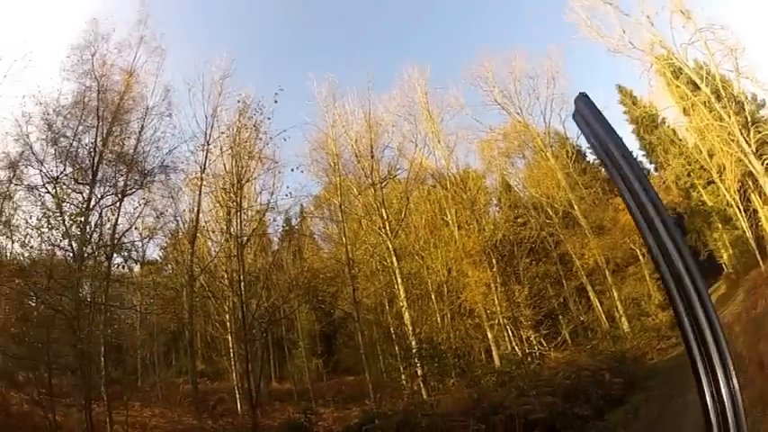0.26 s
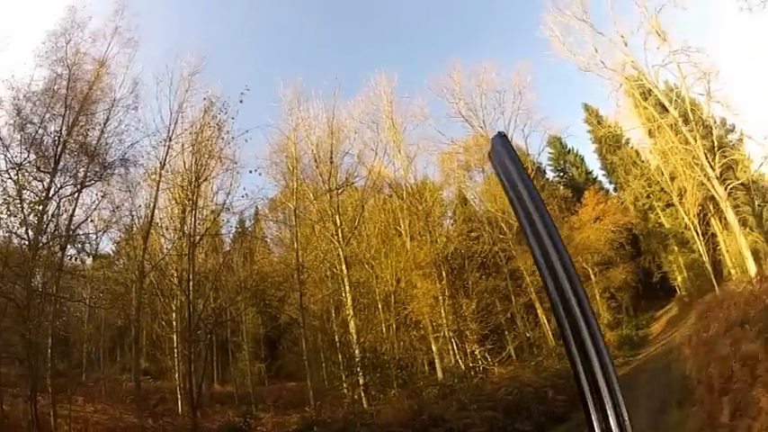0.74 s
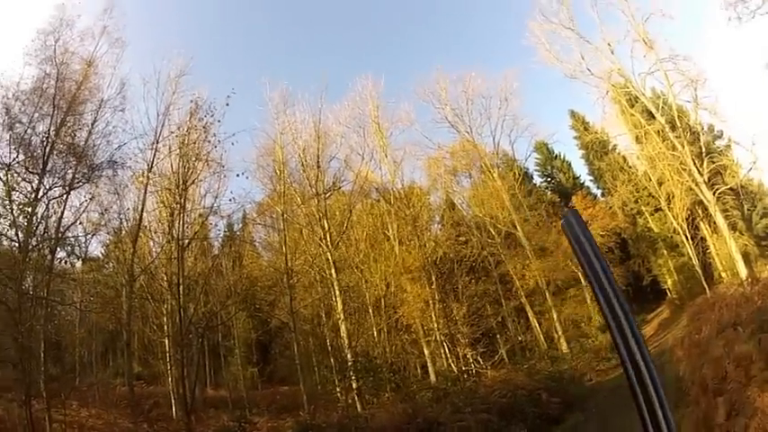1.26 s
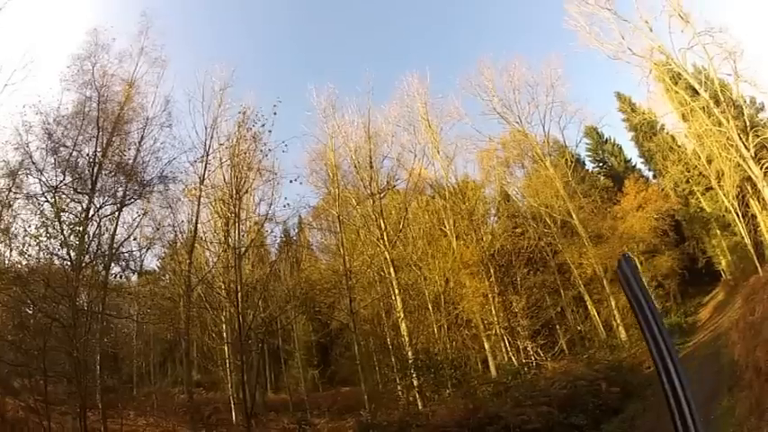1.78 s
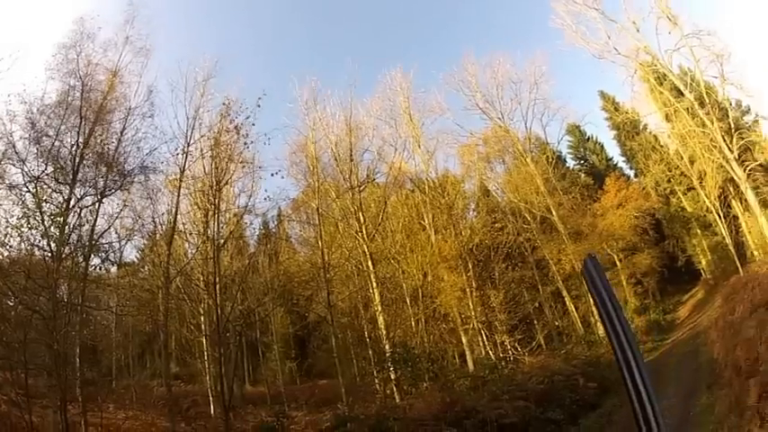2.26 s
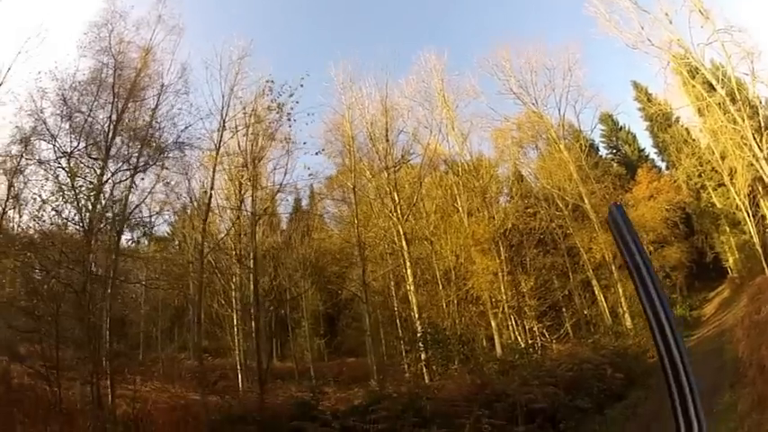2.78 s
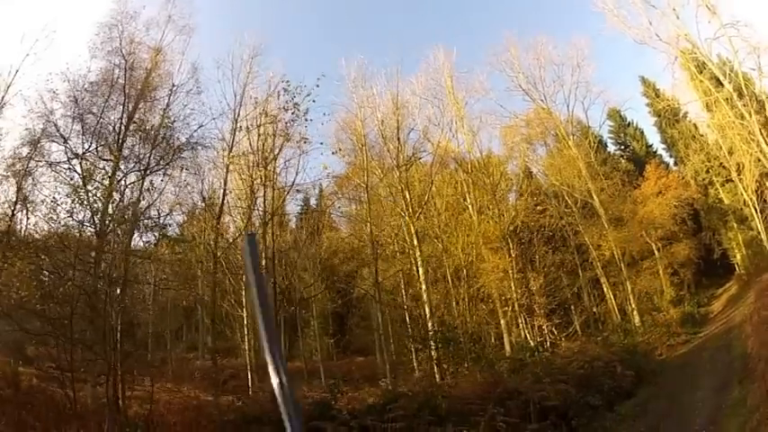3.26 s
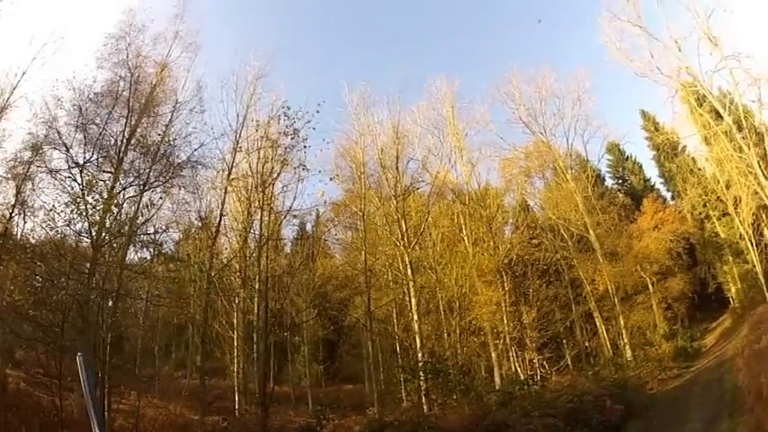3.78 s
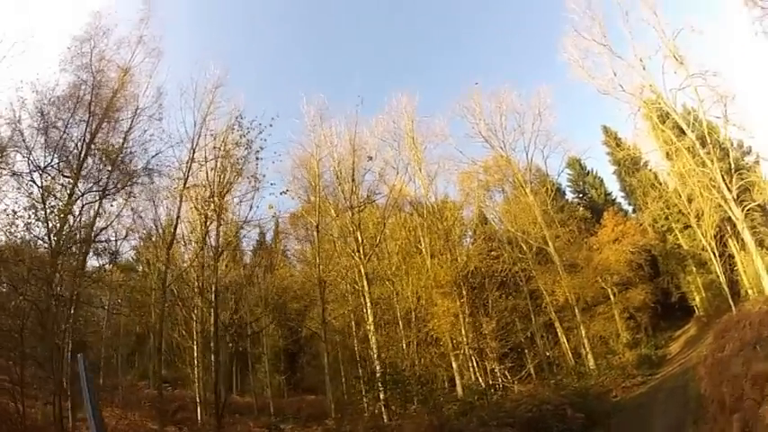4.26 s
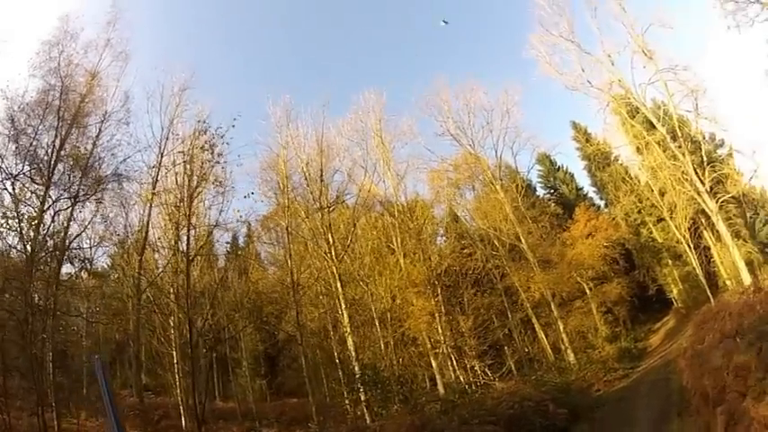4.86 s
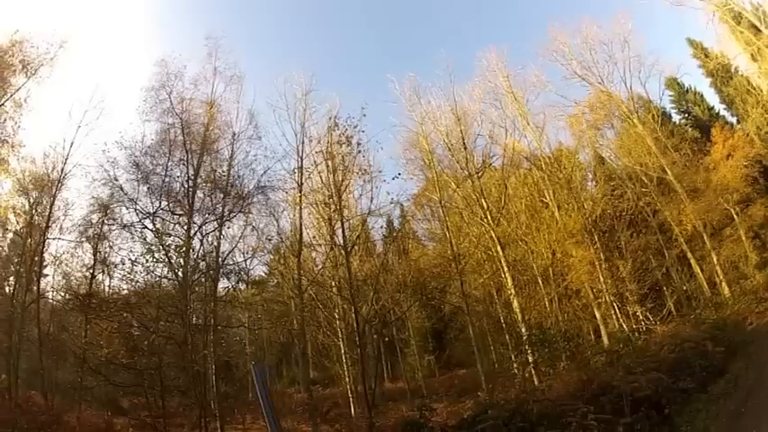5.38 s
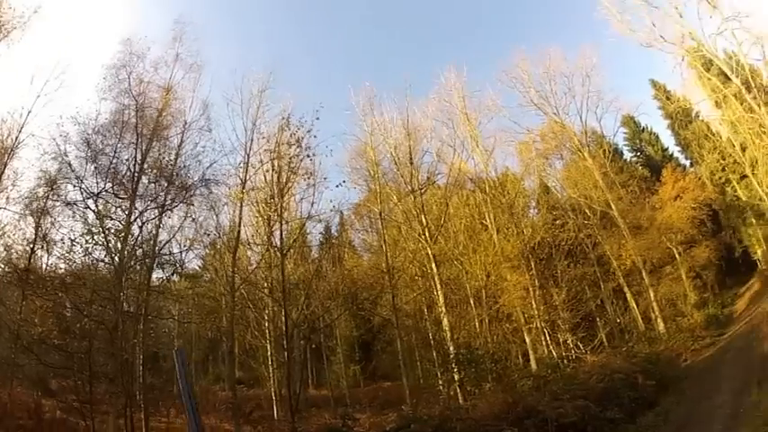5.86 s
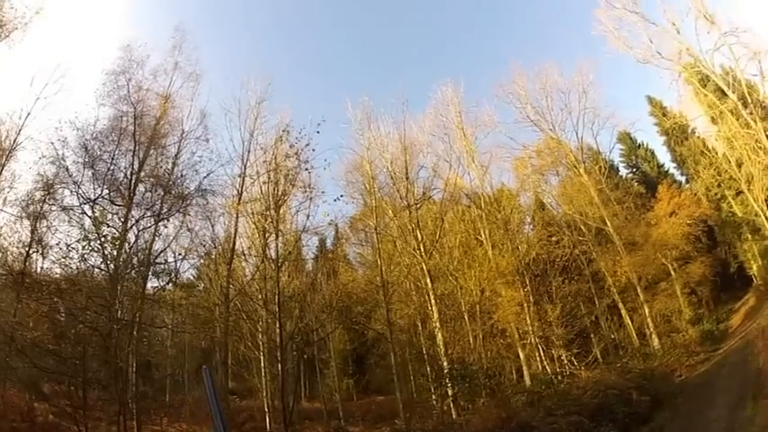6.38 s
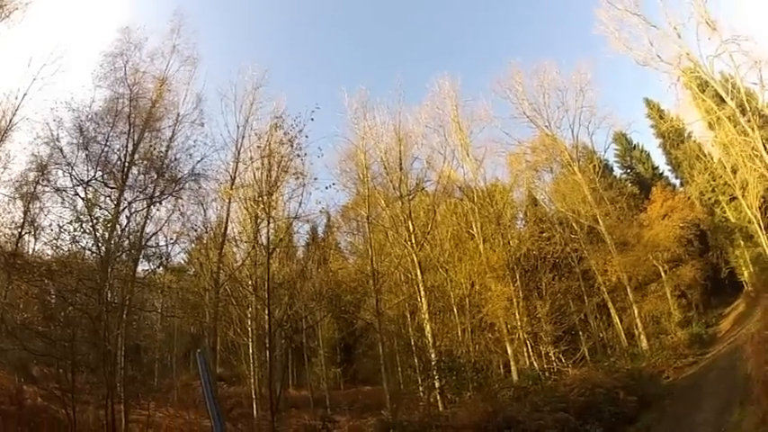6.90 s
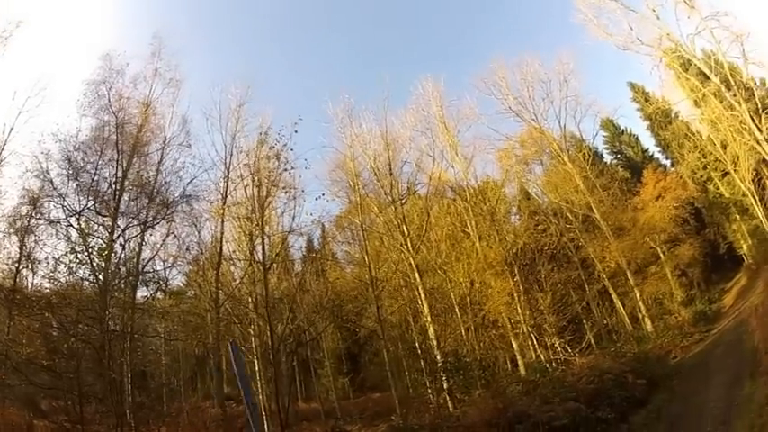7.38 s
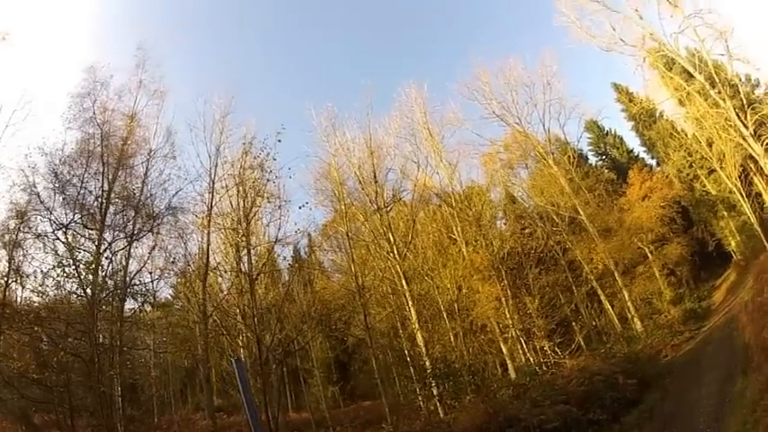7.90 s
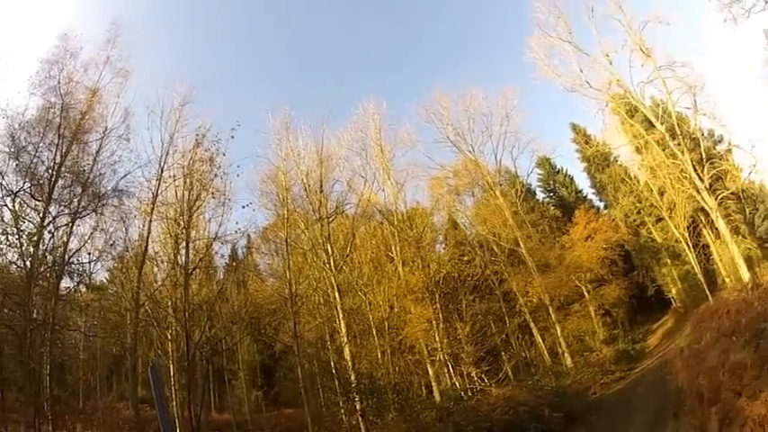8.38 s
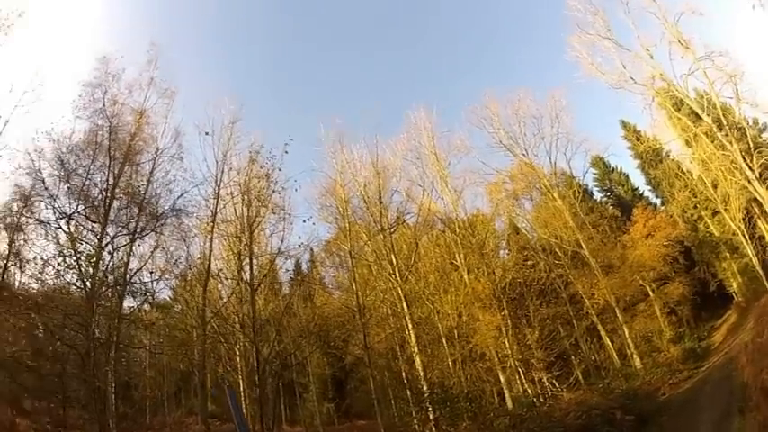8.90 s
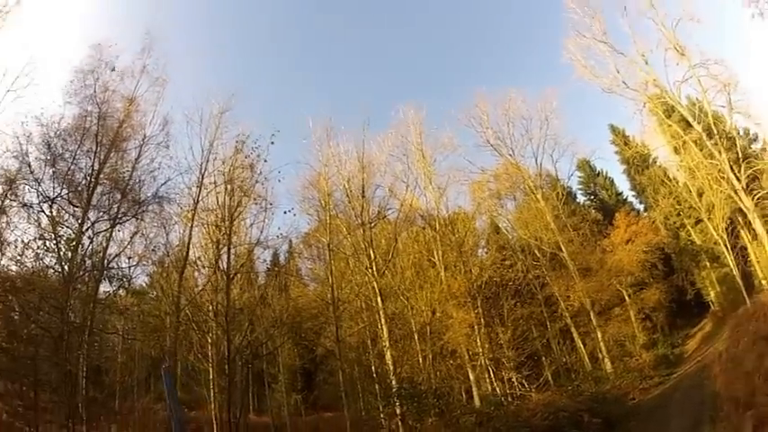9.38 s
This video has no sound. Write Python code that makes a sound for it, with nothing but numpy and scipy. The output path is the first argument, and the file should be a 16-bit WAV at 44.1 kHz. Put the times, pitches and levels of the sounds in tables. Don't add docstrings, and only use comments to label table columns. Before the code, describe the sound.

Quiet wood, light gun rattles and a distant cackling pheasant, then two distorted shotgun shots rolling off the trees, faint ticking, a metallic break-open clack and wind bumps.

```python
import sys
import numpy as np
from scipy import signal
from scipy.fft import rfft, irfft, next_fast_len
from scipy.io import wavfile
from scipy.ndimage import uniform_filter1d

SR = 44100
rng = np.random.default_rng(int(sys.argv[2]) if len(sys.argv) > 2 else 0)


def digitize_waveform(pressure):
    field = np.atleast_2d(pressure).T
    bounded = np.clip(field, -1, 1)
    quanta = np.round(bounded * 32767).astype(np.int16)
    wavfile.write(sys.argv[1], SR, quanta)


def ratio(d):
    e = np.asarray(d, float) / 20
    return 10 ** e


N = 425124
TIME = np.arange(N) / SR


def rms_one(x):
    return x / np.sqrt(np.mean(x ** 2) + 1e-20)


def coloured(x, spectrum):
    hz, db = np.transpose(spectrum)
    size = next_fast_len(N)
    grid_hz = np.maximum(np.arange(size // 2 + 1) * SR / size, 1)
    gain_db = np.interp(np.log(grid_hz), np.log(hz), db, left=-90, right=-90)
    return rms_one(irfft(rfft(x, size) * ratio(gain_db), size)[:N])


def drift(rate_hz):
    knots = rng.standard_normal(int(N / SR * 60) + 2)
    return np.interp(TIME * rate_hz, np.arange(len(knots)), knots)


def bumps(t, rows):
    return sum(db * np.exp(-.5 * ((t - s) / width_s) ** 2) for s, width_s, db in rows)


def resonate(x, hz, width_hz):
    r = np.exp(-np.pi * width_hz / SR)
    b = [(1 - r * r) / 2, 0, (r * r - 1) / 2]
    return signal.lfilter(b, [1, -2 * r * np.cos(2 * np.pi * hz / SR), r * r], x)


def decaying(t, hz, t60_s):
    return np.sin(2 * np.pi * hz * t) * ratio(-60 * t / t60_s)


def add(out, s, sound):
    i = round(s * SR)
    out[i:i + len(sound)] += sound[:N - i]


# shot_s, case_ring_hz, upper_ring_db, gain_clamp_ms
SHOTS = [
    (2.48268, 484, -15, 4.6),
    (3.16530, 474, -13, 4.0),
]
BLOW_DB, HEAD_START_TURNS = 3.6, .16


def blasts():
    out, t = np.zeros(N), TIME[:SR // 10]
    for (shot_s, ring_hz, upper_db, clamp_ms), thump_db in zip(SHOTS, (-13, -10)):
        ring = -np.sin(2 * np.pi * (ring_hz * t + HEAD_START_TURNS)) * ratio(-60 * t / .09)
        ring *= ratio(-60 * np.maximum(t - clamp_ms / 1000, 0) / 0.017)
        upper = 2.2 * decaying(t, 790, 0.04) + 1.9 * decaying(t, 1300, 0.025) + decaying(t, 2120, 0.038)
        upper = ratio(upper_db) * upper
        spray = ratio(-12.5) * resonate(rng.standard_normal(len(t)), 2300, 2400) * ratio(-60 * t / 0.088)
        clamp_db = -17 / (1 + np.exp(np.clip((clamp_ms - 1000 * t) / 0.3, -50, 50)))
        after = ratio(-6.5) * (upper + spray) * (1000 * t > clamp_ms)
        add(out, shot_s, ratio(BLOW_DB + clamp_db) * (ring + upper + spray) + after)
        add(out, shot_s + .002, ratio(thump_db) * decaying(t, 98, .065))
    return out


def roll_db(t, layer, crest_s, loss_db_per_s):
    crest_db, rise_db, near_db_per_s, far_db, far_db_per_s = layer
    late_s = np.maximum(t - crest_s, 0)
    near_power = ratio(-(near_db_per_s + loss_db_per_s) * late_s) ** 2
    far_power = ratio(far_db - far_db_per_s * late_s) ** 2
    rising_db = rise_db * np.clip(1 - t / crest_s, 0, 1)
    return crest_db - rising_db + 10 * np.log10(near_power + far_power)


# hz, level_db_per_hz
BOOM = [(120, -45.5), (200, -17.5), (260, -8.5), (391, -2), (489, 0.5), (581, 1), (646, -3.5), (760, -23.5),
        (990, -45.5), (1670, -120)]
SIZZLE = [(1940, -34), (3300, -6.5), (3560, -3.5), (3860, -2.5), (4200, -4.5), (4630, -5), (5440, -9.5),
          (5950, -10), (7740, -53), (13100, -120)]
RUMBLE = [(21, -48), (35, -8), (91, 3), (126, -3), (162, -3.5), (200, -11.5), (260, -40.5), (440, -120)]
# mode_hz, width_hz, level_db
CRACK = [
    [(835, 150, -5.5), (1151, 110, -1.5), (1590, 110, 0.5), (2240, 220, -2), (2650, 240, -2.5),
     (3050, 770, -5.5)],
    [(820, 87, -5.5), (1027, 140, -1.5), (1525, 100, -3), (2040, 230, -2), (2566, 150, -2.5), (2975, 84, 1),
     (3150, 130, -8)],
]
# crest_s, level_db, treble_loss_db_per_s
SWELLS = [
    (.2, -1.7, 7.5),
    (0.12, -1.3, 5.5),
]
# crest_db, rise_db, near_fall_db_per_s, far_wood_db (re crest), far_fall_db_per_s
LAYERS = [
    (-21, 5.5, 21.5, -12.5, 7),
    (-24.5, 7, 31, -15, 12),
    (-35.5, 3, 42, -34.5, 4),
    (-35.5, 14, 32.5, -16, 6.5),
]
# after_shot_s, half_width_s, lift_db
STANDS = [
    (0.048, 0.01, 3),
    (.18, 0.041, 4.5),
    (.24, 0.011, 1.5),
    (0.401, 0.013, 4),
    (.55, .035, 2),
    (1.98, 0.13, 3),
]
STAND_SHARES = (1.0, 0.13, 0.27, 0.43)
DULLING_DB_PER_S = 4.5


def echo():
    sizes = ratio(1.8 * np.minimum(rng.exponential(1, N), 5)) * rng.choice([-1, 1], N)
    returns = sizes * (rng.random(N) < 4000 / SR) * ratio(0.69 * drift(35) + 1.1 * drift(16))
    boom, sizzle, rumble = coloured(returns, BOOM), coloured(returns, SIZZLE), coloured(returns, RUMBLE)
    out, ends_s = np.zeros(N), [SHOTS[1][0], N / SR]
    for (crest_s, level_db, loss), modes, (shot_s, *_), end_s in zip(SWELLS, CRACK, SHOTS, ends_s):
        t = TIME - shot_s
        lift_db = bumps(t, STANDS)
        crack = np.zeros(N)
        for k, (hz, width_hz, db) in enumerate(modes):
            dulling_db = DULLING_DB_PER_S * np.log2(hz / 1600) * np.clip(t, 0, 2.5)
            crack += ratio(db - dulling_db) * resonate(returns, hz, width_hz) * (-1) ** k
        sounds = (boom, rms_one(crack), sizzle, rumble)
        rolling = np.zeros(N)
        for sound, layer, share, is_high in zip(sounds, LAYERS, STAND_SHARES, (0, 1, 1, 0)):
            layer_db = level_db + roll_db(t, layer, crest_s, loss * is_high) + share * lift_db
            rolling += ratio(layer_db) * sound
        arrived = np.clip((t - .004) / .012, 0, 1) * (TIME < end_s)
        out += arrived * rolling
    return out


# start_s, peak_db, ring_db, rattle_centre_hz
CLACKS = [(0.2399, -59, -36, 3150), (0.5945, -56, -40, 2600), (0.6659, -53, -40, 2040),
          (0.7468, -49, -40, 3100), (0.7524, -45, -40, 2130), (0.7731, -48, -40, 2800),
          (0.9667, -49, -40, 2520), (1.26, -51.5, -40, 3760), (1.5274, -48, -40, 3640),
          (5.9599, -48, -31, 3810), (1.3648, -47, -40, 5100), (4.7794, -52, -35, 5100),
          (4.813, -51, -36, 5100), (5.2664, -45, -40, 5100), (5.4824, -52, -40, 5100),
          (5.974, -27.5, -24, 4060), (5.9864, -29, -14, 4300), (6.2063, -28, -12, 3640),
          (6.2112, -38, 0, 2050), (6.2154, -39, -9, 4200), (6.237, -49, -30, 2210), (6.063, -56, -30, 4800)]
# mode_hz, level_db, t60_s
ACTION = [(1350, -23, 0.087), (2140, -2, 0.099), (2540, 8, 0.015), (3480, -1, 0.022), (4300, 2, 0.0065),
          (4750, -2, 0.049)]
STEEL_HZ, STEEL_T60_S = 4330, .2


def gun():
    out, t = np.zeros(N), TIME[:SR // 4]
    rattles = rng.standard_normal((len(CLACKS), len(t))) * ratio(-60 * t / 0.022)
    lucks = rng.standard_normal((len(CLACKS), len(ACTION)))
    for (start_s, peak_db, ring_db, colour_hz), luck, rattle in zip(CLACKS, lucks, rattles):
        hit = 10.7 * resonate(resonate(rattle, colour_hz, 2300), colour_hz, 2300)
        for (hz, mode_db, t60_s), z in zip(ACTION, luck):
            struck_db = mode_db + 1.1 * z - 3.9 * abs(np.log2(hz / colour_hz))
            hit = hit + ratio(struck_db) * decaying(t, hz * (1 + 0.044 * z), t60_s)
        steel = ratio(ring_db) * decaying(t, STEEL_HZ, STEEL_T60_S)
        add(out, start_s, ratio(peak_db - 15.5) * (hit + steel))
    return out


# start_s, peak_db
CACKLE = [
    (1.272, -59.5),
    (1.402, -52.5),
    (1.54, -52),
    (1.713, -55),
    (1.877, -54),
    (2.04, -53.5),
    (2.201, -53.5),
    (2.417, -52),
]
# formant_hz, width_hz, level_db
THROAT = [(834, 84, 5), (1050, 220, -4.5), (2100, 580, -8.5), (3000, 300, -8), (3800, 150, -5.5),
          (4100, 200, -8), (4630, 1500, -17.5)]
CACKLE_HZ, CACKLE_S = 1033, 0.084


def pheasant():
    source, t = np.zeros(N), TIME[:SR // 4]
    noises = rng.standard_normal((len(CACKLE), 3, len(t)))
    arc = np.sin(np.pi * np.clip(t / CACKLE_S, 0, 1)) ** 0.63
    tail = .5 * (t > CACKLE_S / 2) * ratio(-60 * t / .6)
    for (start_s, peak_db), (waver_noise, breath, flutter_noise) in zip(CACKLE, noises):
        waver = rms_one(uniform_filter1d(waver_noise, size=200))
        flutter = rms_one(uniform_filter1d(flutter_noise, size=350))
        phase = np.cumsum(CACKLE_HZ * (.98 + .04 * arc + .05 * waver)) / SR
        pulses = (np.diff(np.floor(phase), prepend=0) > 0) * 11 * ratio(4 * flutter)
        smear = 2.2 * breath * (arc + tail)
        add(source, start_s, ratio(peak_db + 1) * (pulses * arc + smear))
    return sum(ratio(db) * resonate(source, hz, width_hz) * (-1) ** k
               for k, (hz, width_hz, db) in enumerate(THROAT))


# start_s, peak_db, loudest_ring_hz, length_s
CLUCKS = [(4.089, -46.5, 3050, 0.021), (4.144, -51, 3100, 0.023), (4.321, -51, 3780, 0.022),
          (4.424, -51, 3300, 0.02), (4.55, -57, 3800, 0.024), (4.658, -50, 3260, 0.017),
          (4.83, -51.5, 3260, 0.029), (4.989, -52.5, 4000, 0.02), (5.098, -51, 2930, 0.031),
          (5.187, -52.5, 3000, 0.025), (5.386, -52, 3100, 0.021), (5.506, -52.5, 3040, 0.039),
          (5.74, -52.5, 3800, 0.026), (5.862, -54, 4000, 0.017), (6.0666, -51, 3000, 0.0089),
          (6.2706, -48, 3830, 0.02), (6.413, -49.5, 3850, 0.037), (7.705, -60.5, 2940, 0.013),
          (7.817, -56, 3200, 0.011), (8.428, -61, 3090, 0.016), (8.803, -61, 3000, 0.014),
          (8.897, -56, 3250, 0.0065)]
# mode_hz, width_hz, level_db
CLUCK_MODES = [(855, 146, 7), (1076, 85, -1), (2190, 340, 1.5), (3050, 270, -3.5), (3880, 140, 0.5),
               (4630, 460, -5.5), (5100, 540, -12.5)]


def clucks():
    out, t = np.zeros(N), TIME[:SR // 3]
    noises = rng.standard_normal((len(CLUCKS), len(t)))
    lucks = rng.standard_normal((len(CLUCKS), len(CLUCK_MODES)))
    for (start_s, peak_db, ring_hz, length_s), noise, luck in zip(CLUCKS, noises, lucks):
        burst = noise * ((t < length_s) * np.minimum(t / 0.0047, 1) + ratio(-3.5 - 60 * t / 1.05))
        body = np.zeros(len(t))
        for (hz, width_hz, mode_db), z in zip(CLUCK_MODES, luck):
            body += ratio(mode_db + 2 * z) * resonate(resonate(burst, hz, 3 * width_hz), hz, width_hz)
        ring = 0.95 * resonate(resonate(burst, ring_hz, 440), ring_hz, 120)
        add(out, start_s, ratio(peak_db + 3.0) * (body + ring))
    return out


# start_s, length_s, start_hz, end_hz, level_db
NOTES = [(1.28, 0.12, 950, 970, -59), (1.287, 0.058, 2970, 2770, -63), (1.35, 0.29, 3200, 3290, -70),
         (1.45, 0.078, 4100, 4060, -67), (2.085, 0.046, 748, 860, -56), (2.174, 0.064, 700, 800, -49.5),
         (2.34, 0.085, 3150, 3240, -65.5), (4.11, 0.42, 5480, 5780, -70), (5.2, .07, 5400, 5500, -71),
         (5.334, .12, 5630, 5500, -69), (7.755, 0.027, 2250, 2410, -63), (8.13, 0.11, 1527, 1530, -74.5),
         (8.3, .5, 1200, 1178, -73), (8.56, 0.11, 2420, 2300, -76), (8.56, 0.071, 4930, 4780, -69.5),
         (8.64, 0.14, 2180, 2220, -74), (8.66, 0.19, 759, 668, -61), (9.014, 0.058, 2970, 3400, -60.5),
         (9.16, 0.081, 704, 698, -58), (9.39, 0.05, 3150, 3050, -63.5), (9.52, .16, 2020, 2040, -70)]


def birds():
    out, tremble, waver_hz = np.zeros(N), ratio(3.5 * drift(60)), 20 * drift(60)
    for start_s, length_s, start_hz, end_hz, level_db in NOTES:
        first = int(start_s * SR)
        along = np.arange(min(int(length_s * SR), N - first - 1)) / (length_s * SR)
        pitch_hz = start_hz + (end_hz - start_hz) * along + waver_hz[first:][:len(along)]
        tone = np.sin(2 * np.pi * np.cumsum(pitch_hz) / SR)
        add(out, start_s, ratio(level_db) * np.sin(np.pi * along) ** .5 * tone)
    return out * tremble


# hz, level_db_per_hz
WOOD = [(15, -30), (25, -9.5), (52, -2.5), (108, -11.5), (270, -9), (356, -11), (390, -11.5), (617, -14),
        (1140, -31.5), (1280, -30.5), (1770, -32), (2990, -32), (5070, -37.5), (5950, -39), (7740, -76),
        (13100, -120)]
# time_s, level_db
BREEZE = [
    (0, -70.5),
    (1.2, -70),
    (2.4, -67.5),
    (4.6, -70),
    (5.8, -69),
    (7.0, -70),
    (9.64, -70),
]
# centre_s, lift_db, half_width_s
GUSTS = [(.14, 2, 0.088), (.45, 1, .1), (.84, 10, .06), (1.25, 1.5, 0.083), (2.3, 2, 0.17), (4.57, 9, .04),
         (5.3, 5.5, 0.22), (6.502, -8, 0.73), (7.5, 11.5, 0.25), (8.95, 16, 0.086), (9.15, 14, 0.096),
         (9.552, 8.5, .1)]
# start_s, centre_hz, width_hz, level_db
RUSTLE = (9.55, 2850, 500, -61)
WIND_DB, WIND_FOLLOWS = -56.5, .8


def air():
    leaves_db = np.interp(TIME, *np.transpose(BREEZE))
    gusts_db = bumps(TIME, [(s, width_s, db) for s, db, width_s in GUSTS])
    wind_db = WIND_DB + WIND_FOLLOWS * (leaves_db - leaves_db.mean()) + gusts_db
    duck_db = sum(-np.clip(25 - 30 * (TIME - s), 0, 40) * (TIME > s) for s, *_ in SHOTS)
    leaves = coloured(rng.standard_normal(N), WOOD) * ratio(leaves_db + 15.5 + 1.0 * drift(7.5))
    wind = coloured(rng.standard_normal(N), [(18, -12.5), (35, -8), (70, -4.5), (120, -14), (260, -33.5)])
    wind = wind * ratio(wind_db - 5.5 + 2.0 * drift(1.9))
    start_s, hz, width_hz, db = RUSTLE
    rustle = rms_one(resonate(rng.standard_normal(N), hz, width_hz))
    rustle = rustle * np.clip((TIME - start_s) / .04, 0, 1) * ratio(db)
    return ratio(duck_db) * (leaves + wind) + rustle


TREES_T60_S = 0.85


def among_trees(x, wet_db):
    t = TIME[:SR // 2]
    haze = rng.standard_normal(len(t)) * ratio(-60 * t / TREES_T60_S) * np.minimum(t / 0.024, 1)
    return x + ratio(wet_db) * signal.fftconvolve(x, haze / np.sqrt(np.sum(haze ** 2)))[:N]


# hz, level_db_per_hz
SELF_NOISE = [(18, -44.5), (30, -7.5), (201, -2), (473, -14.5), (644, -14.5), (2620, -16), (4970, -12.5),
              (6020, -30.5), (6780, -13.5), (8800, -25.5), (11400, -59), (19400, -120)]


def scene():
    far = among_trees(pheasant(), wet_db=-7.5) + among_trees(birds() + clucks() + gun(), wet_db=-21.0)
    mono = blasts() + echo() + air() + far
    bass = resonate(resonate(np.roll(mono, 90), 120, 250), 120, 250)
    apart = ratio(-79.5) * coloured(rng.standard_normal(N), SELF_NOISE) + ratio(-38.5) * bass
    return np.array([mono + apart, mono - apart])


def low_pass(x, hz):
    return signal.sosfiltfilt(signal.cheby2(12, 30, hz, fs=SR, output="sos"), x)


def top_cut(x):
    return signal.sosfilt(signal.butter(12, 16650, fs=SR, output="sos"), x)


def record(dry):
    input_cut_hz, top_hz, fizz_hz, output_cut_hz = 5900, 15600, 15000, 16700
    rolled = signal.sosfiltfilt(signal.butter(5, input_cut_hz, fs=SR, output="sos"), dry)
    held = np.repeat(signal.resample_poly(rolled, 40, 147, axis=1), 4, axis=1)
    held = signal.resample_poly(held, 147, 160, axis=1)[:, :N]
    held = low_pass(np.pad(held, ((0, 0), (0, N - held.shape[1]))), top_hz)
    wander = np.cumsum(.35 * rng.standard_normal(N)) + .45 * rng.standard_normal((2, N))
    fizz = .5 + .5 * np.sin(2 * np.pi * fizz_hz * TIME + wander)
    overload = np.clip((-held - .85) / .35, 0, 1.1)
    stored = low_pass(np.clip(held, -1, 1) + overload * fizz, output_cut_hz)
    finished = np.clip(stored, -1, 1)
    return top_cut(finished)


dry = scene()
out = record(dry)
digitize_waveform(out)
```